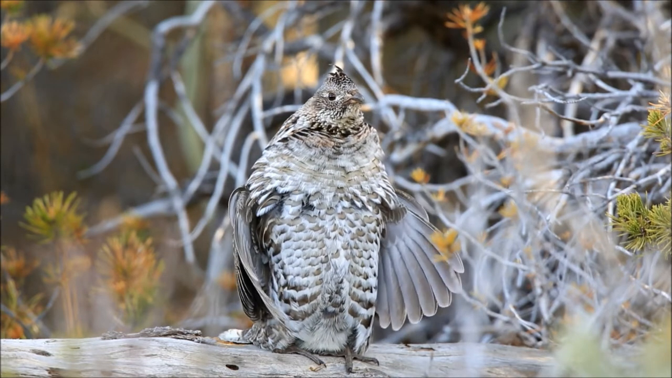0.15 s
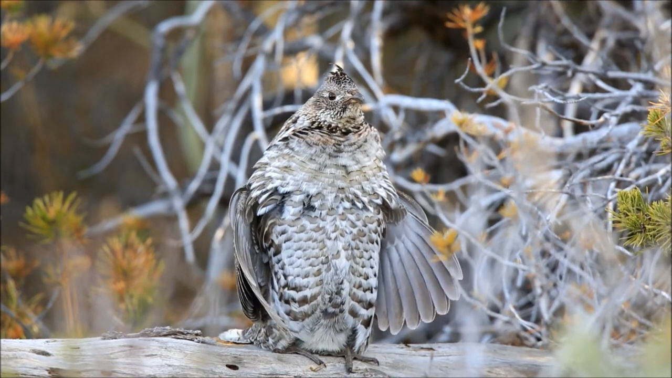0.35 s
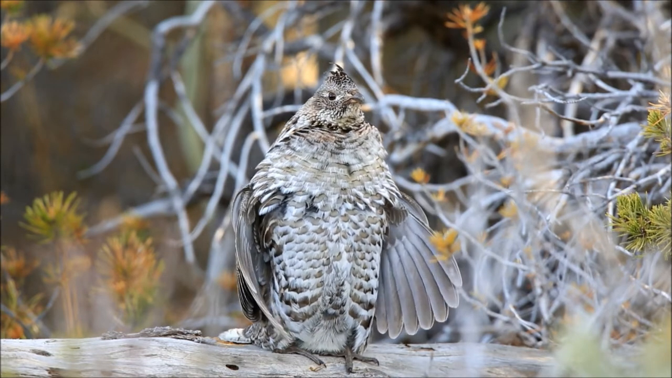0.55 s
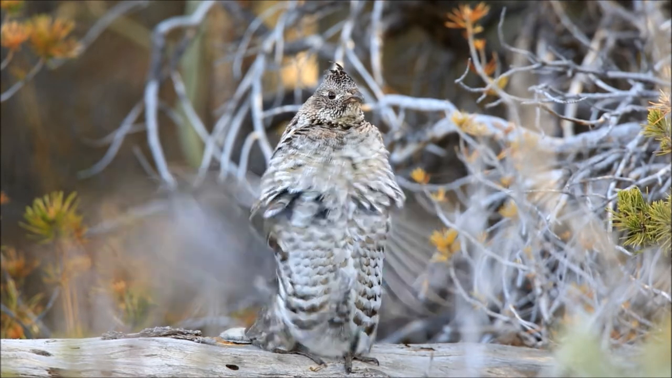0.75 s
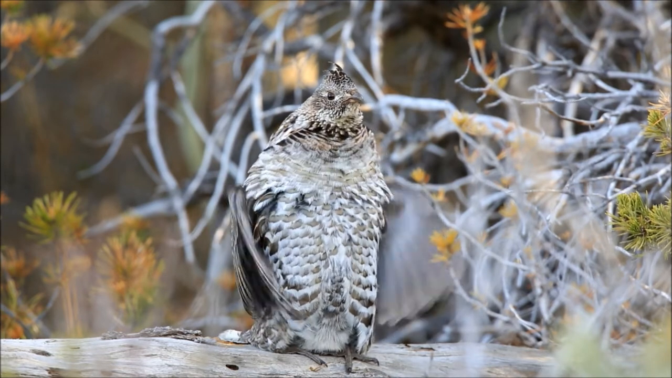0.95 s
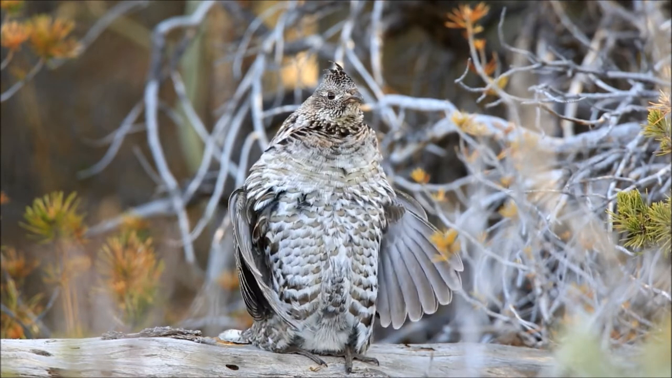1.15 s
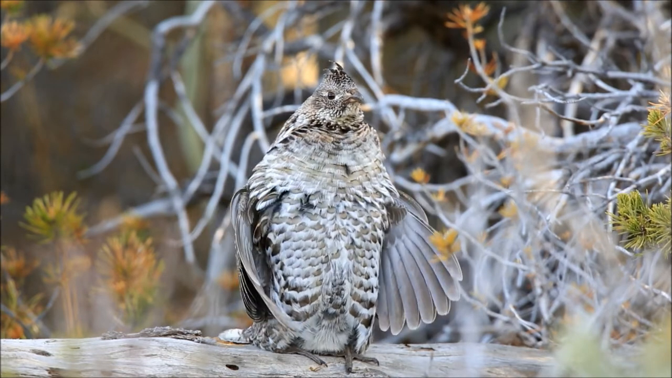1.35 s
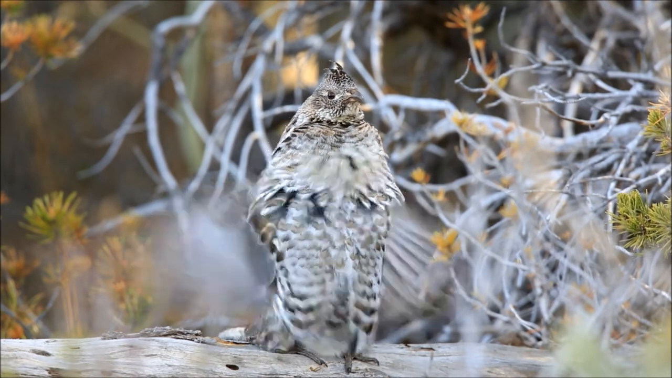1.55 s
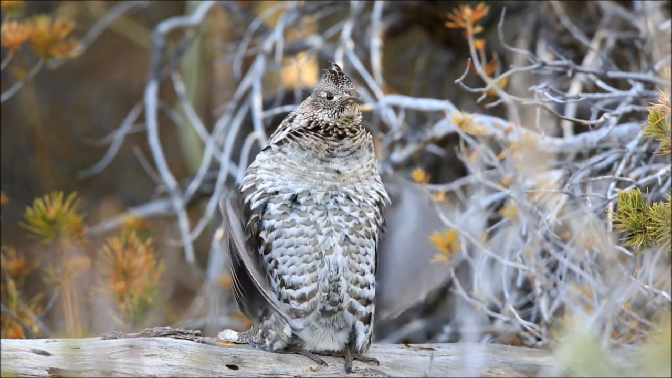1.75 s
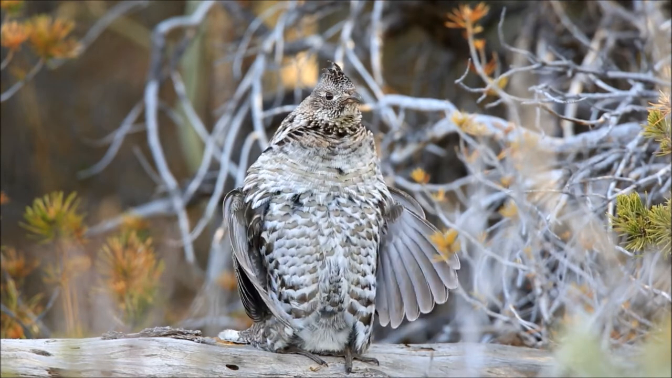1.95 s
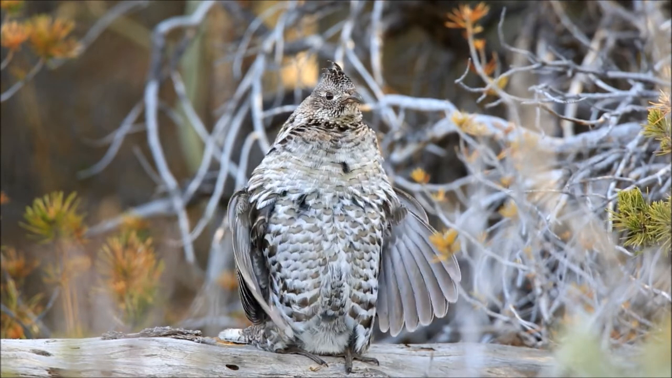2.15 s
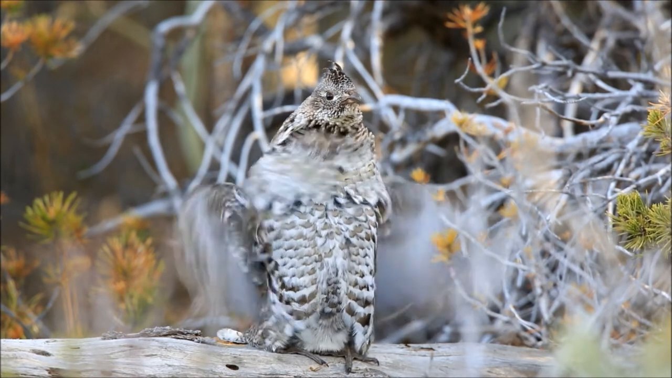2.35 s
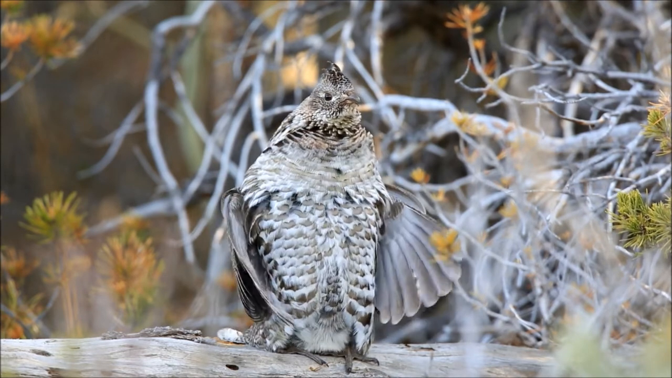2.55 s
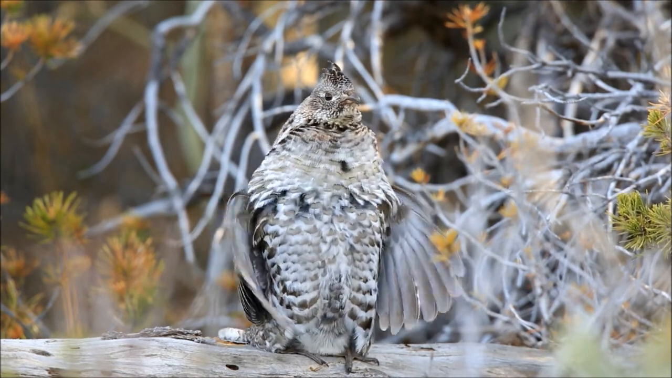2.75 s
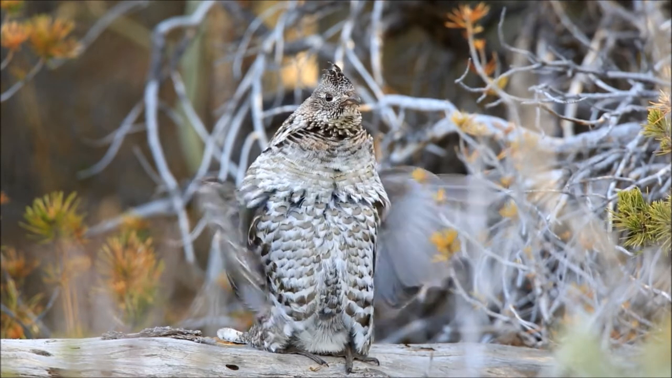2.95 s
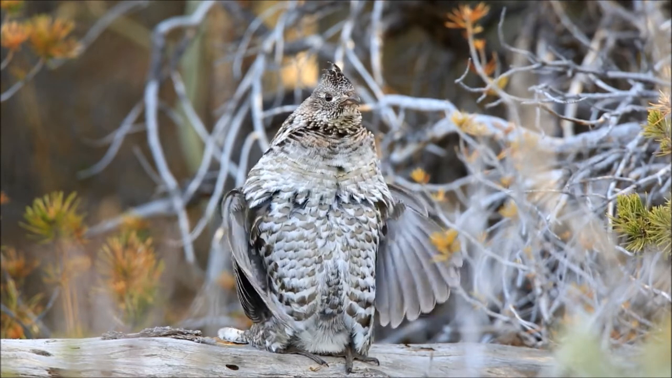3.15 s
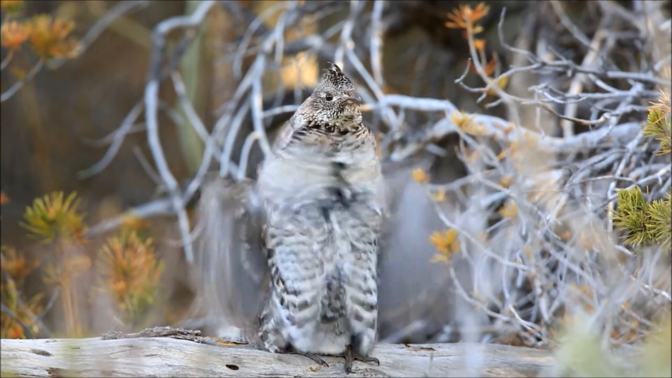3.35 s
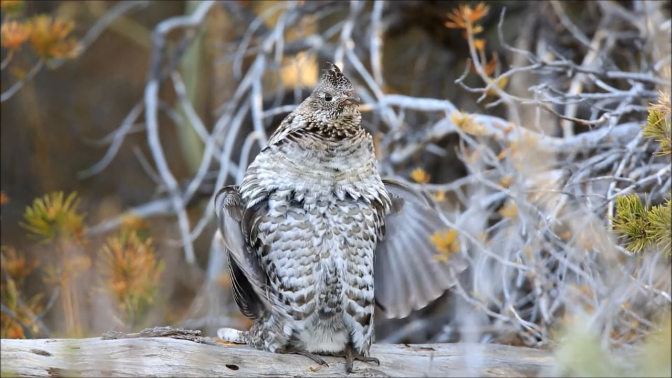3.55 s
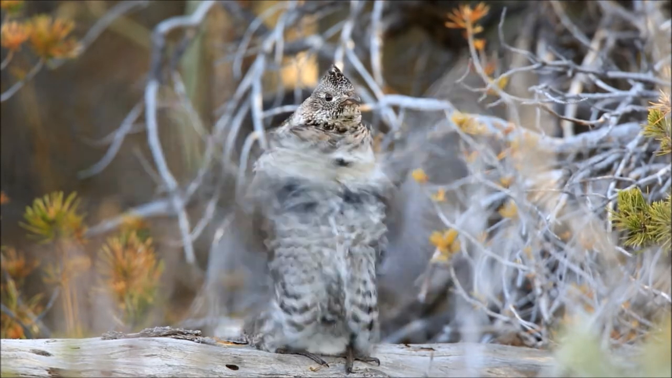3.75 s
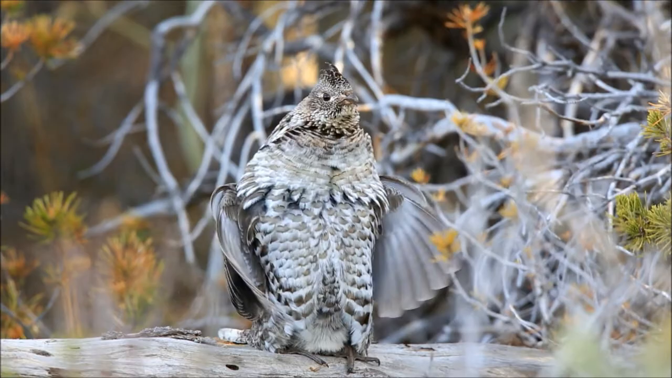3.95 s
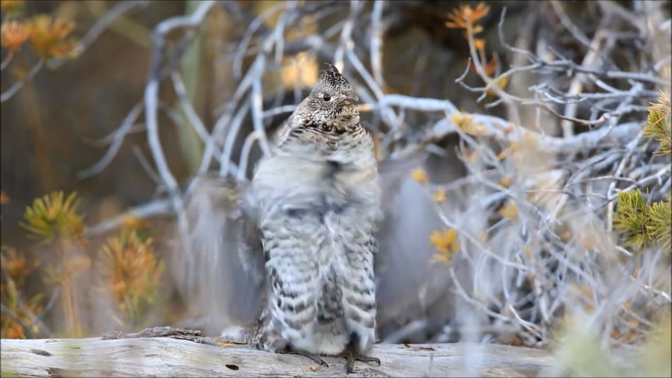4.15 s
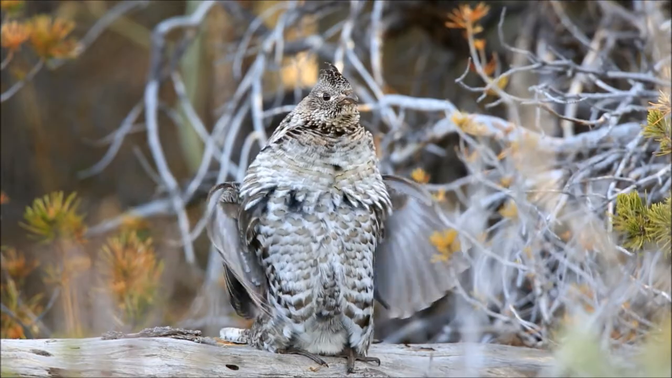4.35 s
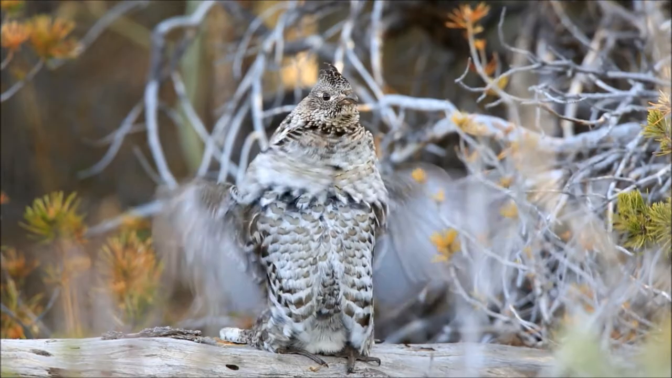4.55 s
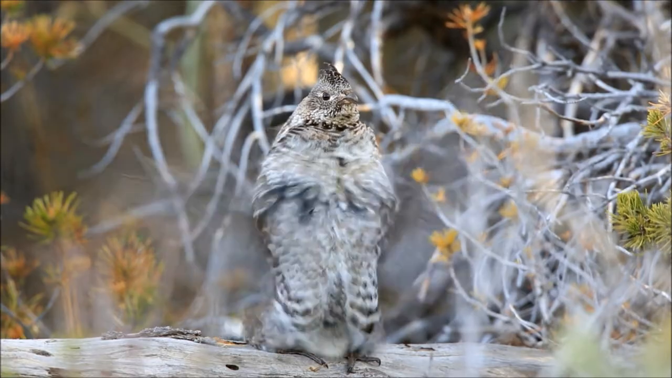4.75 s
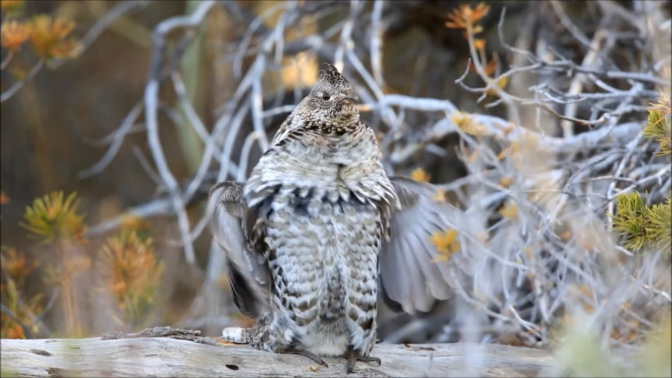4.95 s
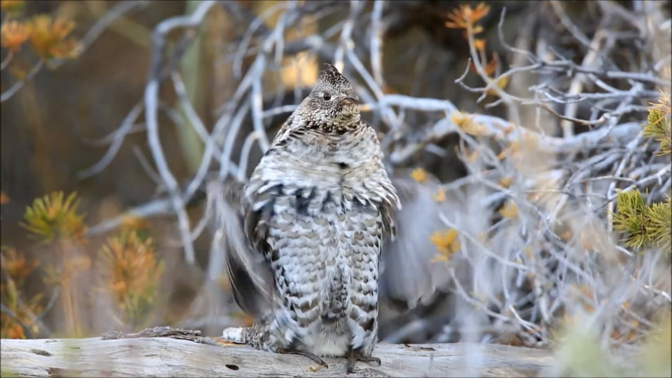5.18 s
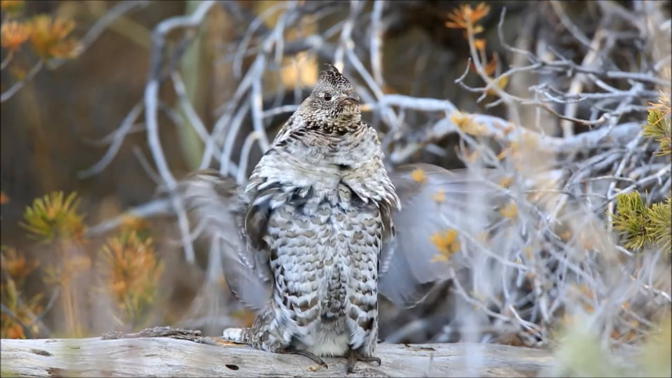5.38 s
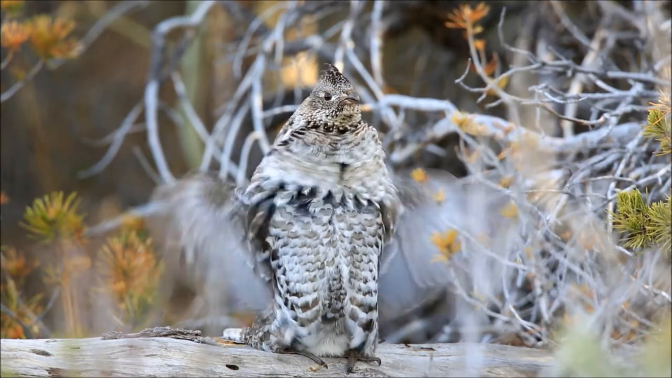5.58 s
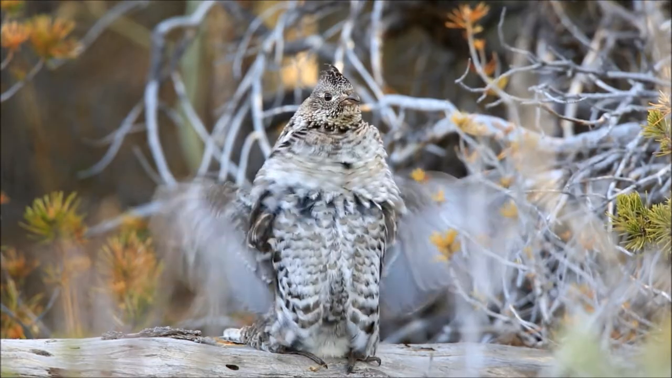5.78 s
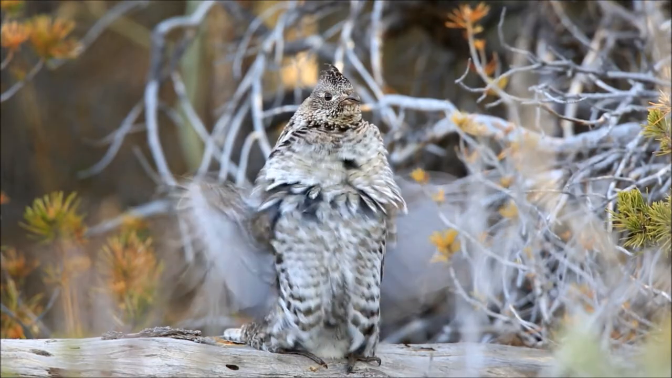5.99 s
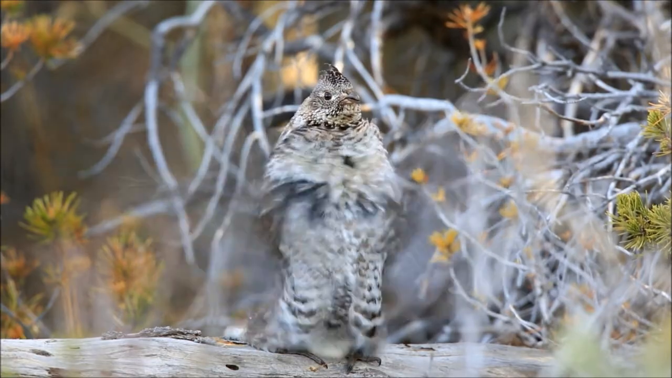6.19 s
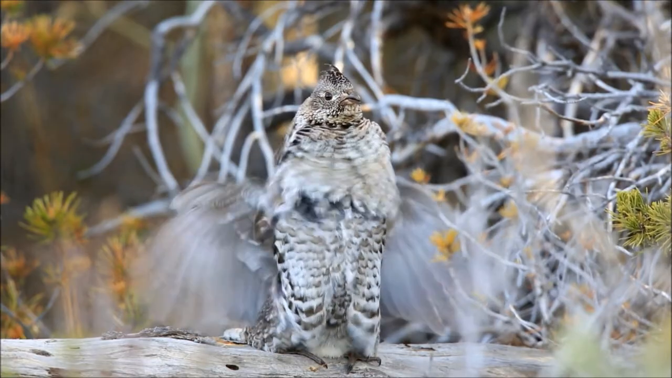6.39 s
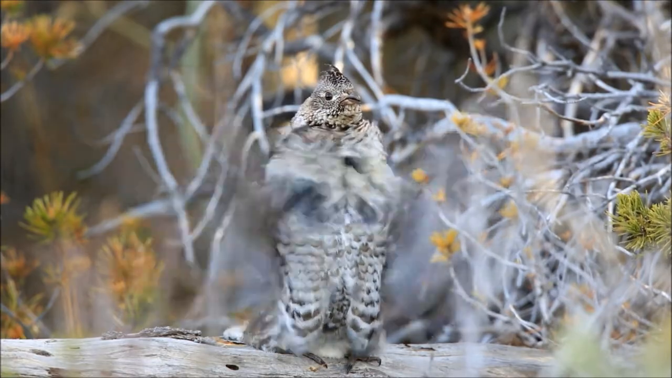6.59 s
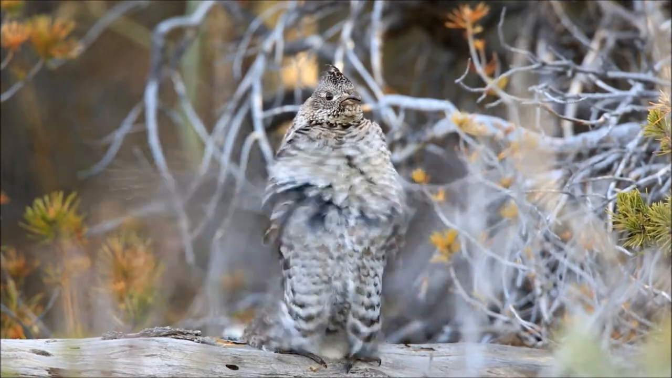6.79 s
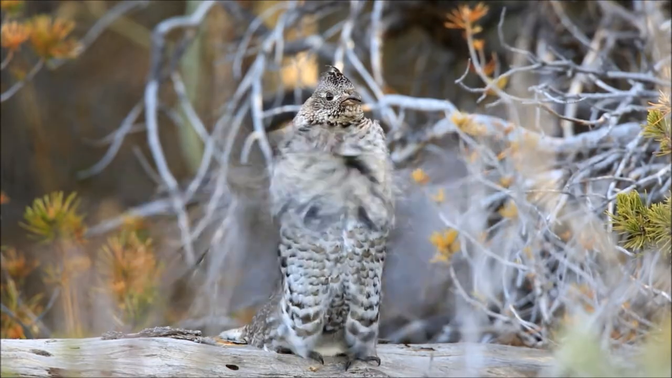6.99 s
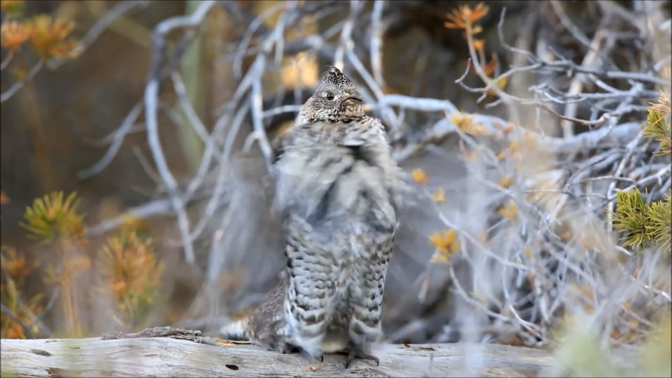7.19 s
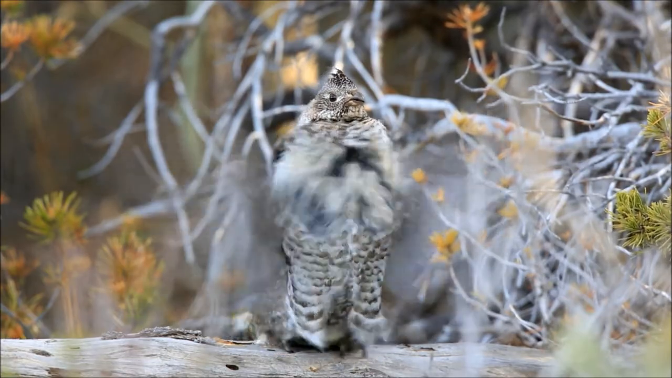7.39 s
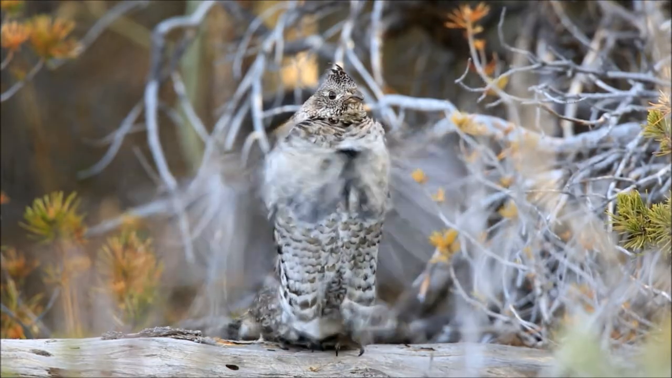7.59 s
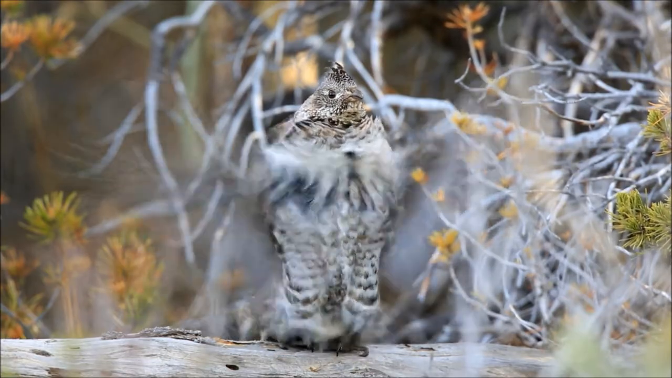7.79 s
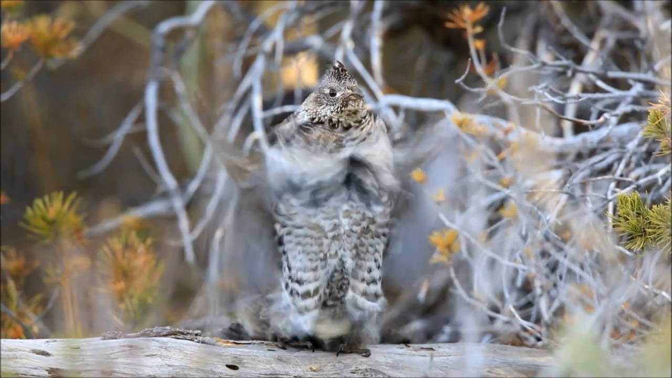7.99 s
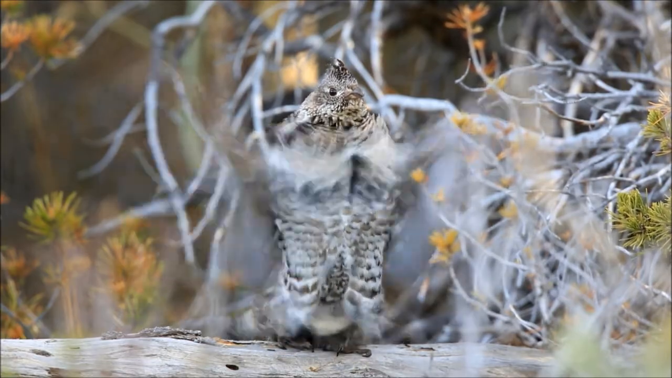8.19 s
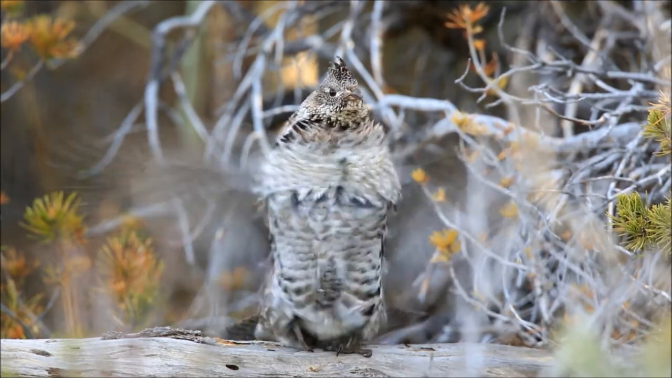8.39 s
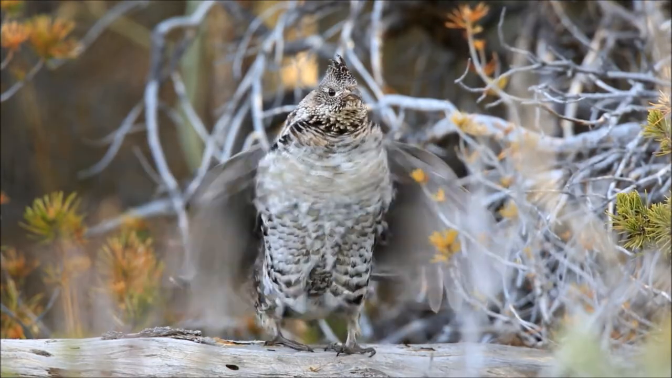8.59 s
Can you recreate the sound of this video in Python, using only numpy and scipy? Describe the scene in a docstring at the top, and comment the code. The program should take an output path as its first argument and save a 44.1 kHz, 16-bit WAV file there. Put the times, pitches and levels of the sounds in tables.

```python
"""A grouse drums on a log in quiet woodland: each wing stroke shoves the air into one low thump,
and the feathers swish around it. The beats speed up into a whirr, slow a little and stop;
the trees send back soft low echoes. Far off a small bird trills and another whistles,
over still air, a faint hum and microphone hiss."""
import sys
import numpy as np
from scipy import signal
from scipy.fft import rfft, irfft, next_fast_len
from scipy.io import wavfile
from scipy.ndimage import uniform_filter1d

SR = 44100
rng = np.random.default_rng(int(sys.argv[2]) if len(sys.argv) > 2 else 0)


def int16_out(signal):
    """Quantize to a 16-bit WAV file."""
    q = np.round(np.clip(np.atleast_2d(signal).T, -1, 1) * 32767)
    wavfile.write(sys.argv[1], SR, q.astype(np.int16))


N = 380583
TIME_S = np.arange(N) / SR
FIRST_BEAT_S, BEAT_COUNT = .7907, 43

# still woodland air: freq_hz, gain_db
AIR_SPECTRUM = [(20, -5), (50, 6.5), (110, -3.5), (200, -5.5), (400, -10.5), (750, -12), (1200, -19),
                (2600, -21), (5000, -29), (15000, -41)]
# microphone hiss: freq_hz, gain_db
HISS_SPECTRUM = [(200, -3), (1500, 1.5), (5000, -0.5), (9000, -1.5), (15500, -1.5)]
# distant hum: time_s, level_db
HUM_LEVELS = [(0.0, -74.5), (0.99, -62), (1.18, -69.5), (1.73, -64), (2.11, -75.5), (2.9, -63),
              (4.4, -69.5)]
# distant whistles: start_s, length_s, start_hz, end_hz, level_db
WHISTLE_NOTES = [(0, .17, 2600, 2820, -66.5), (1.58, .48, 3200, 2600, -69.5), (2.28, .33, 2560, 2330, -68),
                 (2.86, .42, 2980, 2380, -69), (5.36, .18, 3350, 3300, -70), (6.44, .15, 3320, 3290, -63.5)]
# two alternating trill notes: first_s, period_s, start_hz, end_hz, gain_db
TRILL_CHIRPS = [(1.958, .0635, 4650, 5550, 0), (1.985, .0615, 4580, 3735, -1.5)]
# trill envelope: time_s, level_db
TRILL_LEVELS = [(1.9, -70), (2.6, -63.5), (3.2, -60.5), (4.36, -62.5), (4.5, -72)]
# echoes off trunks and banks: delay_s, gain_db
TRUNK_ECHOES = [(0.0235, -22), (0.0455, -27), (0.0598, -40), (0.0714, -28.5), (0.0812, -32), (.1202, -34),
                (0.132, -40.5), (0.157, -35)]
# air churned by fast wings: freq_hz, gain_db
CHURN_SPECTRUM = [(220, 2), (340, -3), (520, 0), (750, -5), (1100, -5), (1500, -10.5), (3000, -14),
                  (5000, -47)]
# air rushing round a wing: freq_hz, gain_db
RUSH_SPECTRUM = [(240, 2.5), (320, -15.5), (420, -1.5), (520, -1), (740, -1.5), (1000, -7.5), (1300, -14),
                 (2000, -45), (5000, -45)]
# quills rubbing: freq_hz, gain_db
RASP_SPECTRUM = [(700, -7), (1150, -2), (1400, -5), (1650, 0.5), (2050, -5), (2700, -2.5), (3300, -3),
                 (3800, -11), (7000, -18), (15000, -26.5)]
# quill snap: freq_hz, gain_db
SNAP_SPECTRUM = [(550, -1), (2000, -6), (3100, 1.0), (4200, -13), (8000, -14.5), (15000, -22)]
# stiff quills snapping: time_s, level_db
LOUD_SNAPS = [(0.7815, -44), (2.8443, -51), (3.3295, -38.5), (4.47, -44), (7.1213, -43), (8.2921, -39)]
# feather noise of sweep, lift, power stroke, stop, recoil: offset_s, spread_s, rush_db, rasp_db
STROKE_PHASES = [(0.014, 0.02, -19, -12.5), (-0.0176, 0.0049, -4.5, -8.5), (-0.0058, 0.0025, 1.5, 2.5),
                 (0.00058, 0.0023, 1.5, -4), (0.0131, 0.0053, -6, -10)]
# air shoves of lift, power stroke, stop: offset_s, spread_per_push, gain_db
AIR_SHOVES = [(-.0133, 0.54, -18.5), (-.00235, 0.43, 0.5), (-.0022, .19, -28)]
# tempo, quickening until the bird tires: time_s, gap_s
BEAT_GAPS = [(.79, .8137), (2.28, .56713), (3.34, .42219), (5.05, .24099), (6.06, .15077), (6.71, .10424),
             (6.91, .08134), (7.3, .04753), (7.81, .08783), (8.42, .12617)]
# stroke strength, building, easing, surging, giving out: time_s, effort_db
BEAT_EFFORT = [(.79, -17.5), (2.4, -14), (4.3, -12.5), (6.45, -13), (7.03, -16), (7.24, -15.5), (7.34, -12),
               (7.43, -17), (8.15, -16.6), (8.42, -21), (8.55, -28)]


def undb(db):
    """Decibels to gain."""
    return 10 ** (np.asarray(db) / 20)


def unit(x):
    """Scale to rms 1."""
    return x / np.sqrt(np.mean(x ** 2))


def bell(t, spread):
    """Gaussian of height 1 at t = 0."""
    return np.exp(-.5 * (t / spread) ** 2)


def curve(time_s, table):
    """Interpolate a two-column table."""
    return np.interp(time_s, *np.transpose(table))


def colour(x, spectrum):
    """Filter by a (freq_hz, gain_db) table; rms 1."""
    hz, db = np.transpose(spectrum)
    size = next_fast_len(N)
    bin_hz = np.maximum(np.fft.rfftfreq(size, 1 / SR), 1)
    gain = undb(np.interp(np.log(bin_hz), np.log(hz), db)) * np.minimum(bin_hz / hz[0], 1) ** 2
    return unit(irfft(rfft(x, size) * gain, size)[..., :N])


def walk(rate_hz):
    """Smooth random drift, spread near 1."""
    hold = max(int(SR / rate_hz), 2)
    steps = np.repeat(rng.standard_normal(N // hold + 1), hold)
    return 1.3 * uniform_filter1d(uniform_filter1d(steps, hold), hold)[:N]


def stereo_noise(side_db):
    """Mid/side white noise as left and right."""
    mid, side = rng.standard_normal((2, N))
    return mid + undb(side_db) * side * np.array([[1], [-1]])


def add(track, start_s, sound):
    """Mix a sound in at start_s."""
    i = int(round(start_s * SR))
    a, b = max(i, 0), min(i + len(sound), N)
    if b > a:
        track[a:b] += sound[a - i:b - i]


def scatter(x, t60_s, onset_s):
    """Diffuse return from twigs and trunks: builds, then decays."""
    t = TIME_S[:SR]
    tail = rng.standard_normal(SR) * np.exp(-np.log(1000) * t / t60_s) * (1 - bell(t, onset_s))
    return signal.fftconvolve(x, tail / np.sqrt(np.sum(tail ** 2)))[:N]


def background(air_db=-59.5, hiss_db=-56, hum_hz=161.8, hum_drift=0.0059):
    """Softly swelling air, steady microphone hiss, a faint wavering hum."""
    swell_db = .4 * walk(3)
    air = colour(stereo_noise(side_db=-15.5), AIR_SPECTRUM) * undb(air_db + swell_db)
    hiss = colour(stereo_noise(side_db=-2), HISS_SPECTRUM) * undb(hiss_db)
    phase = 2 * np.pi * np.cumsum(hum_hz * (1 + hum_drift * walk(4.01))) / SR
    hum = unit(np.sin(phase)) * undb(curve(TIME_S, HUM_LEVELS))
    return air + hiss + hum


def whistles():
    """Slurred whistles from deep in the wood, heard only as scatter; longer notes warble wider."""
    song, warble = np.zeros(N), walk(220)
    for start_s, length_s, start_hz, end_hz, level_db in WHISTLE_NOTES:
        n = int(length_s * SR)
        bend = 1 + .17 * length_s * warble[int(start_s * SR):][:n]
        phase = 2 * np.pi * np.cumsum(np.linspace(start_hz, end_hz, n) * bend) / SR
        add(song, start_s, undb(level_db) * np.sqrt(2 * np.hanning(n)) * np.sin(phase))
    return scatter(song, t60_s=0.15, onset_s=0.0037)


def trill(note_s=0.0223, uneven_db=1, pitch_drift=0.0177, wet_db=-5):
    """A small distant bird alternates quick rising and falling chirps, no two alike."""
    song, n = np.zeros(N), int(note_s * SR)
    end_s = TRILL_LEVELS[-1][0]
    pitch_ratio = 1 + pitch_drift * walk(25)
    for first_s, period_s, start_hz, end_hz, gain_db in TRILL_CHIRPS:
        phase = 2 * np.pi * np.cumsum(np.linspace(start_hz, end_hz, n)) / SR
        for time_s in np.arange(first_s, end_s, period_s):
            chirp = np.sin(phase * pitch_ratio[int(time_s * SR)]) * np.hanning(n)
            add(song, time_s - note_s / 2, undb(gain_db + curve(time_s, TRILL_LEVELS)) * chirp)
    song *= undb(uneven_db * walk(11))
    return song + undb(wet_db) * np.array([scatter(song, t60_s=0.47, onset_s=.01) for _ in range(2)])


def woods(thump, swish, low_db=-31, high_db=-13):
    """Trunks and banks echo the thump, with a diffuse tail; twigs scatter the swish to either side."""
    echoes = np.zeros(N)
    for delay_s, gain_db in TRUNK_ECHOES:
        add(echoes, delay_s, undb(gain_db) * thump)
    low = undb(low_db) * scatter(thump, t60_s=0.97, onset_s=0.037)
    high = undb(high_db) * np.array([scatter(swish, t60_s=1.0, onset_s=0.0045) for _ in range(2)])
    return echoes + low + high


def wing_beats(base_push_s=0.0057, hurry_s=0.014, slack_db=-31, full_db=-12):
    """One row per beat: time_s, effort_db, push_s, swish_db."""
    times_s = [FIRST_BEAT_S]
    while len(times_s) < BEAT_COUNT:
        times_s.append(times_s[-1] + curve(times_s[-1], BEAT_GAPS))
    gap_s, effort_db = curve(times_s, BEAT_GAPS), curve(times_s, BEAT_EFFORT)
    # weak strokes push longer, hurried ones shorter
    push_s = base_push_s * (1 + undb(slack_db - effort_db) ** 2) / (1 + (hurry_s / gap_s) ** 2)
    swish_db = -44.5 + 0.69 * (effort_db - full_db)
    return np.column_stack([times_s, effort_db, push_s, swish_db])


def whirr(beats, rush_db=-50.5, rasp_db=-54.0, steepness=3.05):
    """At high beat rates the wings never rest: feather noise runs on between strokes."""
    times_s = beats[:, 0]
    midpoints_s = (times_s[1:] + times_s[:-1]) / 2
    rate_hz = np.interp(TIME_S, midpoints_s, 1 / np.diff(times_s), left=0, right=0)
    rush = undb(rush_db) * colour(rng.standard_normal(N), CHURN_SPECTRUM)
    rasp = undb(rasp_db) * colour(rng.standard_normal(N), RASP_SPECTRUM)
    return (rate_hz / rate_hz.max()) ** steepness * (rush + rasp)


def quill_snaps(beats, decay_s=.0019, gain_db=1, tick_db=-4.0, uneven_db=2, lead_s=.0055):
    """Quills catch and release with a tick before each thump; a few stiff ones snap loudly."""
    envelope = np.zeros(N)
    times_s, _, _, swish_db = beats.T
    ticks = zip(times_s - lead_s, swish_db + tick_db + uneven_db * rng.standard_normal(BEAT_COUNT))
    decay = np.exp(-TIME_S[:SR // 50] / decay_s)
    for time_s, level_db in [*ticks, *LOUD_SNAPS]:
        add(envelope, time_s - decay_s / 2, undb(level_db + gain_db) * decay)
    return envelope * colour(rng.standard_normal(N), SNAP_SPECTRUM)


def feathers(beats, gain_db=-3, uneven_db=2.1, flutter_db=1.3, ticks_per_s=1200, tick_db=-10):
    """Air rushes round the wings in each stroke phase; quills rasp and tick against each other."""
    rush_env, rasp_env = np.zeros((2, N))
    t = TIME_S[:SR // 7] - .06
    jitters_db = uneven_db * rng.standard_normal((BEAT_COUNT, len(STROKE_PHASES)))
    for (time_s, _, _, swish_db), beat_jitters_db in zip(beats, jitters_db):
        for (offset_s, spread_s, rush_db, rasp_db), jitter_db in zip(STROKE_PHASES, beat_jitters_db):
            swell = undb(swish_db + jitter_db) * bell(t - offset_s, spread_s)
            add(rush_env, time_s + t[0], undb(rush_db) * swell)
            add(rasp_env, time_s + t[0], undb(rasp_db) * swell)
    rush = colour(rng.standard_normal(N), RUSH_SPECTRUM)
    tick_sizes = rng.choice([-1, 1], N) * undb(4.0 * np.minimum(rng.exponential(size=N), 4))
    ticks = unit(tick_sizes * (rng.random(N) < ticks_per_s / SR))
    friction = rng.standard_normal(N) * undb(flutter_db * walk(500))
    rasp = colour(friction + undb(tick_db) * ticks, RASP_SPECTRUM)
    return undb(gain_db) * (rush_env * rush + rasp_env * rasp)


def wing_thumps(beats, leak_hz=65.9, gain_db=8.0, skew=.15, uneven_db=2, uneven_s=0.00039):
    """Each shove is a suction pulse, rising faster than it fades; its lows leak round the wings."""
    pressure = np.zeros(N)
    t = TIME_S[:SR // 10] - .05
    jitters = rng.standard_normal((BEAT_COUNT, len(AIR_SHOVES), 2))
    jitters[:, 1] = 0  # only lift and stop vary
    for (time_s, effort_db, push_s, _), beat_jitters in zip(beats, jitters):
        for (offset_s, spread_per_push, shove_db), (late, hard) in zip(AIR_SHOVES, beat_jitters):
            size = undb(effort_db + shove_db + gain_db + uneven_db * hard)
            progress = (t - offset_s - uneven_s * late) / (spread_per_push * push_s)
            add(pressure, time_s + t[0], -size * bell(progress, 1 + skew * np.tanh(progress)))
    return signal.sosfilt(signal.butter(3, leak_hz, "high", fs=SR, output="sos"), pressure)


def scene():
    """Grouse straight ahead, wood all around."""
    beats = wing_beats()
    thump = wing_thumps(beats)
    swish = feathers(beats) + quill_snaps(beats) + whirr(beats)
    return thump + swish + woods(thump, swish) + trill() + whistles() + background()


def record(dry, low_cut_hz=23, high_cut_hz=15600):
    """The recorder cuts the deepest rumble and the top."""
    lean = signal.sosfiltfilt(signal.butter(2, low_cut_hz, "high", fs=SR, output="sos"), dry)
    return signal.sosfilt(signal.ellip(10, .1, 80, high_cut_hz, fs=SR, output="sos"), lean)


dry = scene()
out = record(dry)
int16_out(out)
```